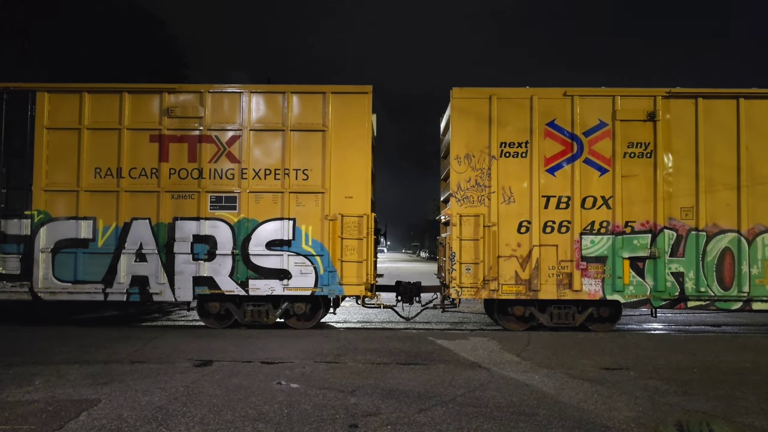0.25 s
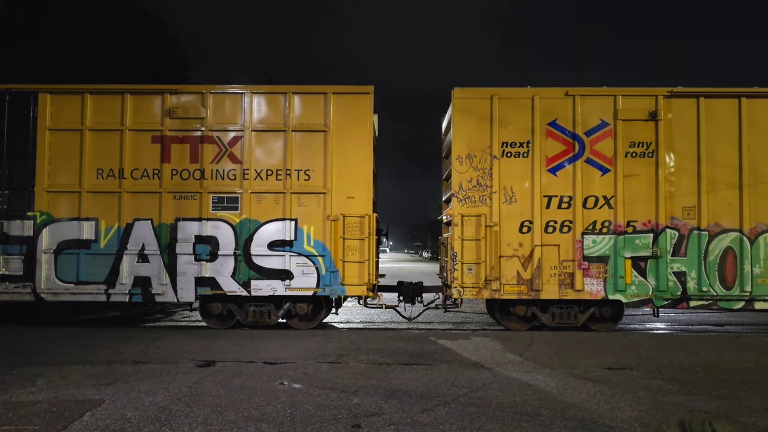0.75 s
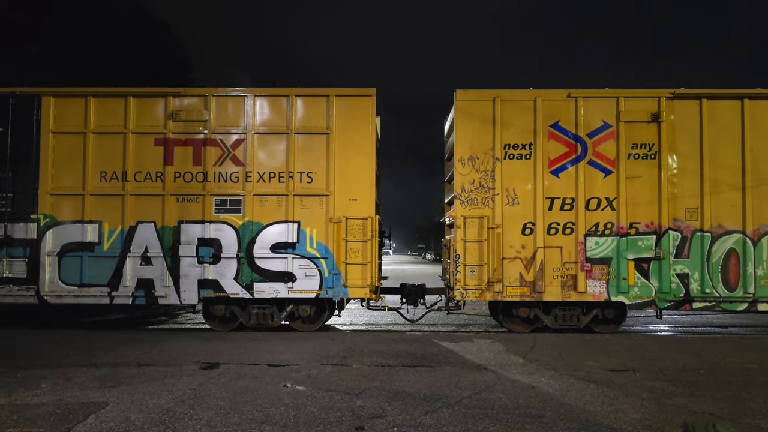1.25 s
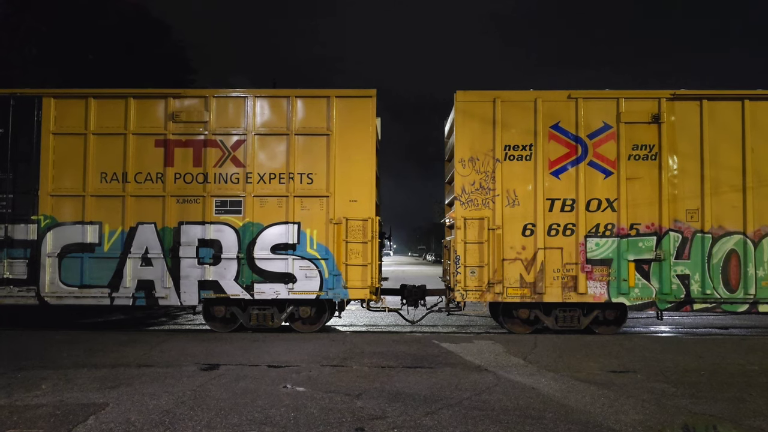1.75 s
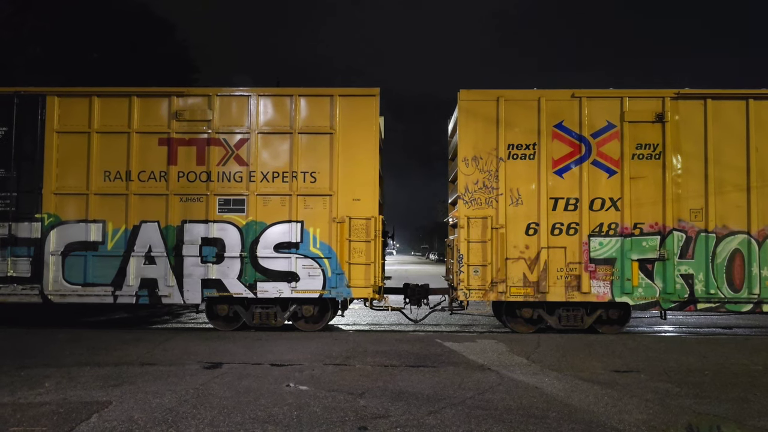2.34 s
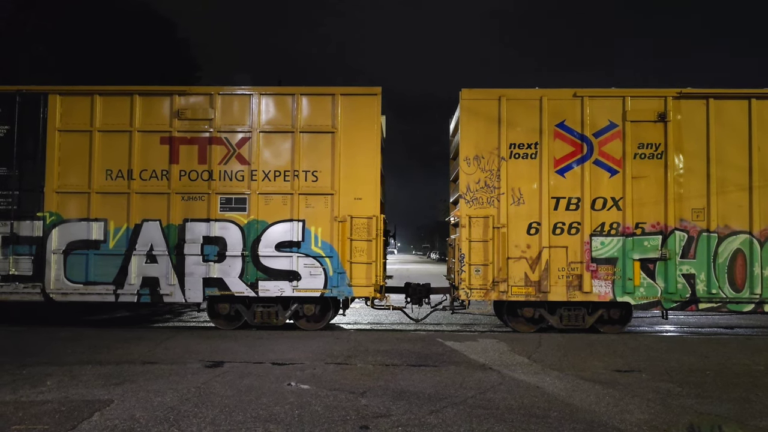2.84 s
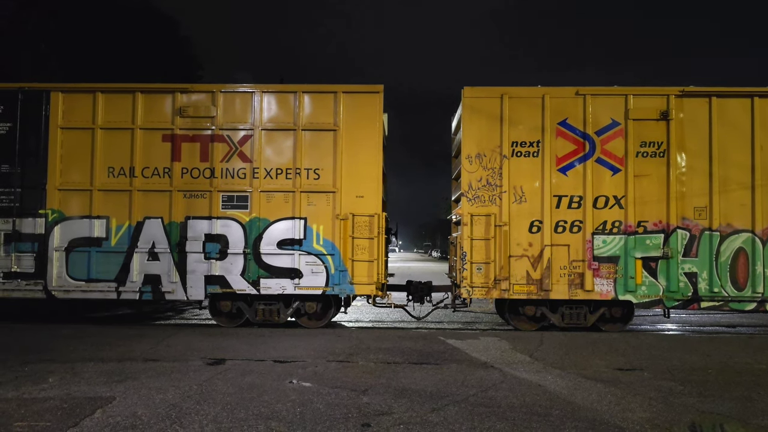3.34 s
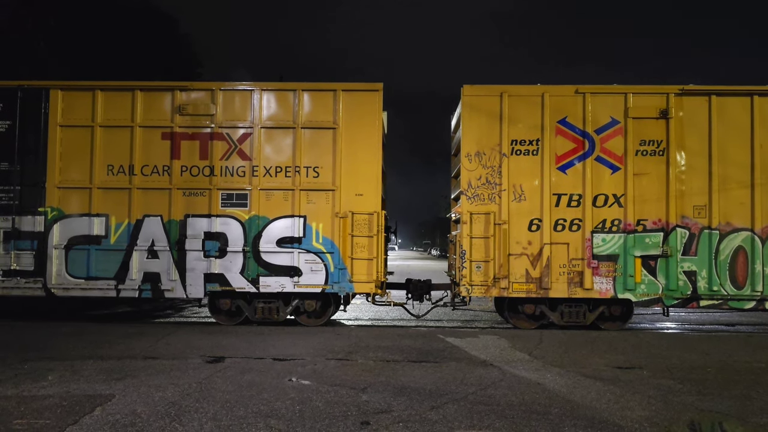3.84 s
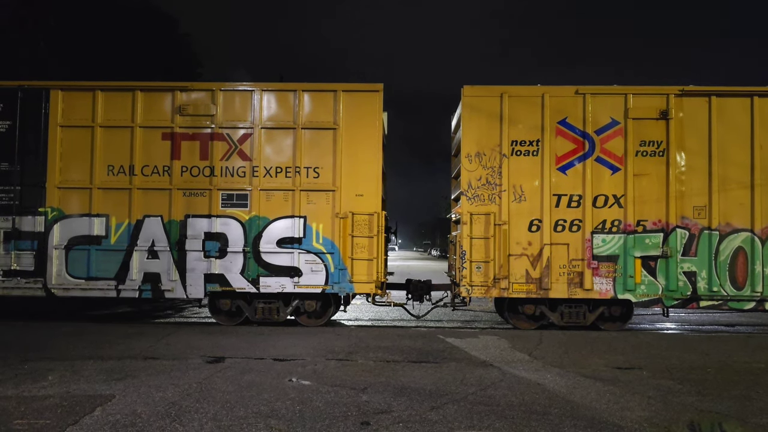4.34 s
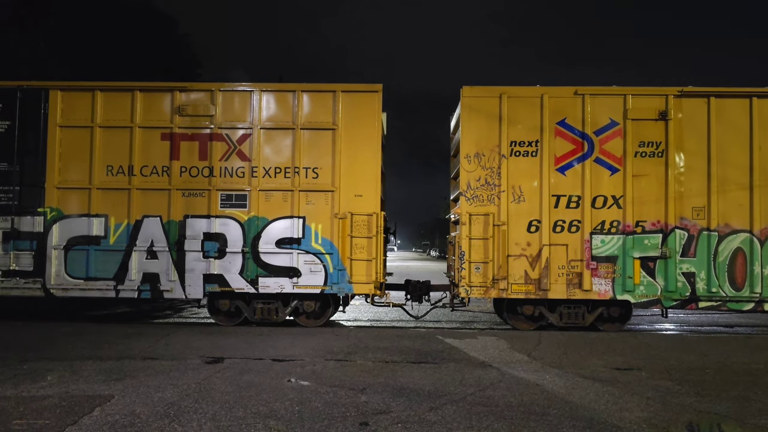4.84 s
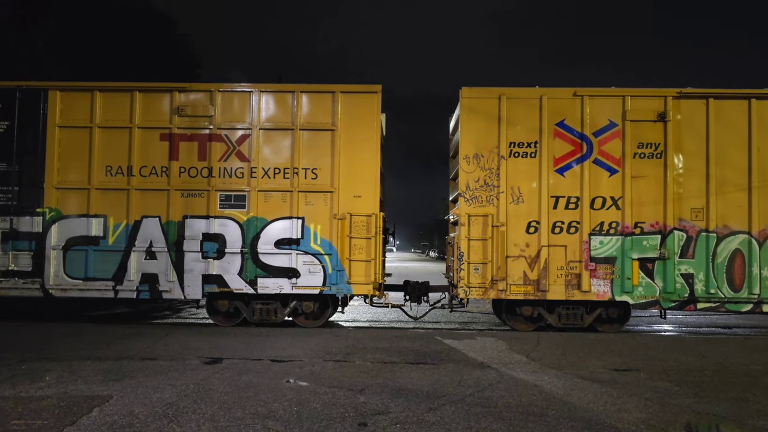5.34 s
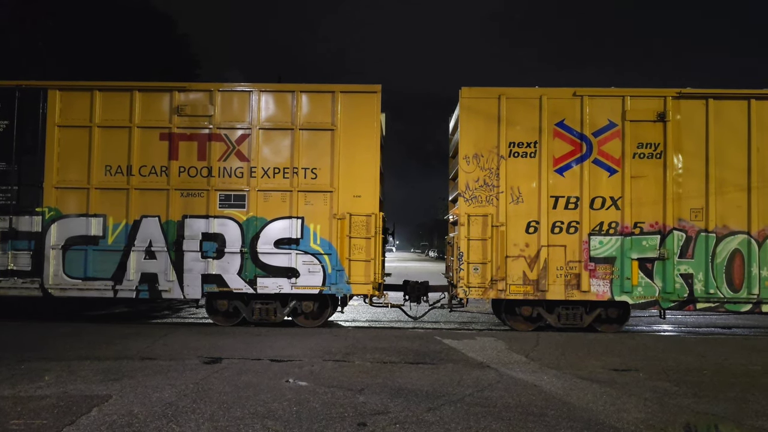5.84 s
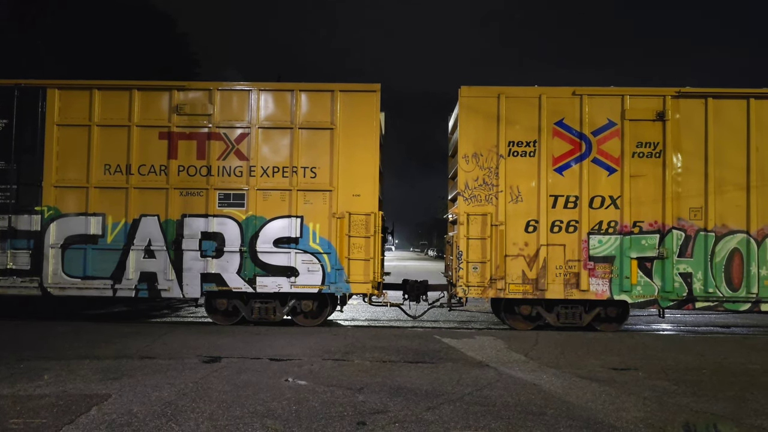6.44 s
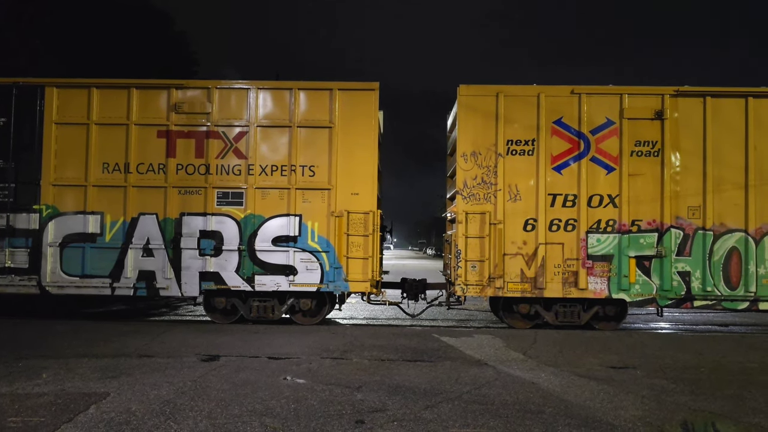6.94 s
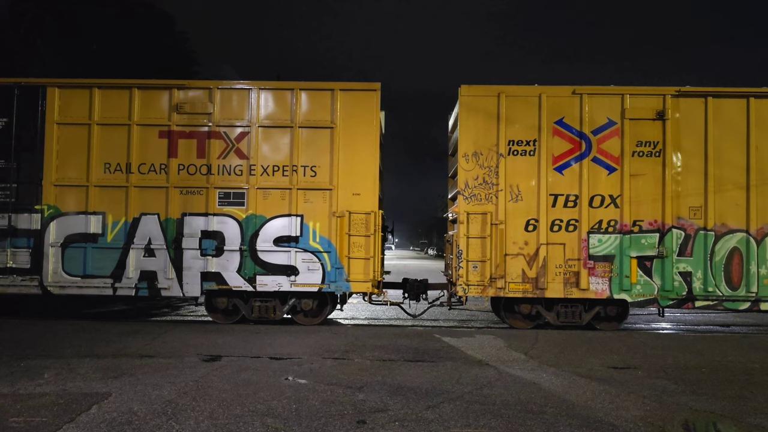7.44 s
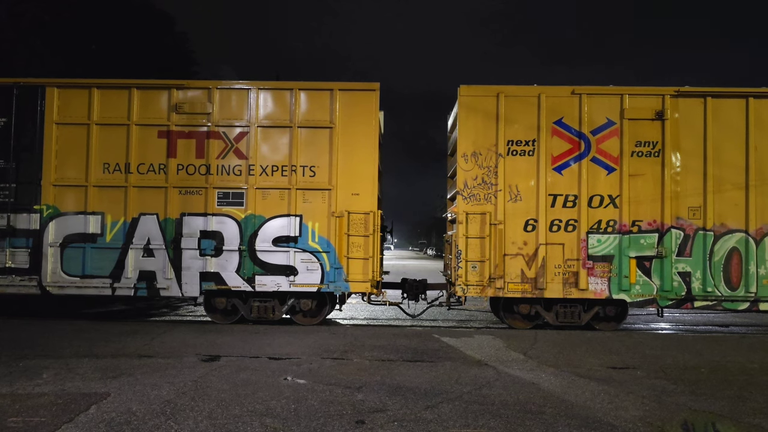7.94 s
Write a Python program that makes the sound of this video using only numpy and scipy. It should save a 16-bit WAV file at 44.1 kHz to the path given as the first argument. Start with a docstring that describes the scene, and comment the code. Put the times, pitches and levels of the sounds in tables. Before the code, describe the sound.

A steel coupler clanks and an empty boxcar booms and shudders, followed by three high bird calls over night insects and faint engine rumble.

```python
"""A rail yard at night. A freight train takes up slack: the drawbar groans, a steel coupler clanks a little
to the left, then the draft gear bottoms out and an empty boxcar booms, rattles and shudders. A bird gives
three falling two-voiced whistles that echo off the cars. Behind them a diesel idles far off, a cricket
trills among shrill insects, and two faint ticks and two far whooshes pass."""
import sys
import numpy as np
from scipy import signal
from scipy.fft import rfft, irfft, next_fast_len
from scipy.io import wavfile
from scipy.ndimage import map_coordinates

SR = 44100
rng = np.random.default_rng(int(sys.argv[2]) if len(sys.argv) > 2 else 0)


def persist_wave(psi):
    """Save psi, clipped to +-1, as 16-bit WAV."""
    counts = np.round(np.clip(psi, -1, 1) * 32767).astype(np.int16)
    wavfile.write(sys.argv[1], SR, np.atleast_2d(counts).T)


N = 361090


def coupler(ring_db=-32.5, clash_db=-24.5, crack_db=-22, scatter_db=-5, wet_db=-14):
    """The knuckles chatter; each contact cracks and rings the castings, a little differently."""
    # Steel faces meeting. Each row: start in seconds, level in dB.
    contacts = [(0.342, -5.5), (0.348, -1.5), (0.358, 0), (0.371, -11), (0.383, -3.5), (0.398, -14)]
    # Casting modes. Each row: frequency in Hz, level in dB, T60 in seconds.
    casting_modes = [(167, 1.5, 0.58), (726, 0, 0.27), (979, -4, 0.34), (1610, 4, 0.16), (1701, -5, 0.29),
                     (1730, -6, 0.19), (1974, -4, 0.35), (2100, -10, 0.23), (2150, 1.5, 0.31),
                     (2270, -10, 0.45), (2880, -2, 0.41), (2950, 4.5, 0.17), (3343, -9, 0.34),
                     (3760, -7, 0.2), (3930, -10, 0.26), (4680, -16, .3), (4640, 0, 0.32),
                     (5146, -18, 0.32), (5870, -2, 0.45), (7900, -1.5, 0.26), (8040, -11.5, 0.51),
                     (8780, -13.5, 0.31), (10900, -19, 0.23), (11886, -8, 0.28), (12700, -20, .36)]
    # Dense casting modes; bare face contact. Each row: frequency in Hz, relative density in dB.
    clash_spectrum = [(70, -45), (120, -26), (170, 1.5), (400, -2), (480, -5), (740, -2.5), (1100, -10.5),
                      (1650, 0), (2300, -3.5), (2700, -6), (3100, -7), (4700, -10.5), (7400, -20),
                      (9700, -34), (12000, -29), (14000, -41)]
    crack_spectrum = [(300, -23), (1700, 1.5), (3500, -10), (7000, -11), (9500, -23), (11000, -13),
                      (12500, -25), (14000, -44)]
    # Decay of the dense modes. Each row: frequency in Hz, T60 in seconds.
    clash_t60 = [(150, 0.48), (600, 0.71), (1700, 0.33), (5000, 0.54), (12000, 0.48)]
    # Each row: frequency in Hz, left minus right in dB.
    balance = [(400, 0.5), (1500, -3.5), (2400, -2), (4400, 3.5), (8000, 13), (12000, 10)]
    t = np.arange(SR // 2) / SR
    hz, mode_db, t60_s = np.transpose(casting_modes)[..., None]
    steel, clash, scattered = np.zeros(N), np.zeros(N), np.zeros((2, N))
    rise = 1 - np.exp(-t / 0.0015)
    for start_s, db in contacts:
        strength, detune, phase = rng.standard_normal((3, len(hz), 1))
        detuned_hz = hz * (1 + 0.002 * detune * np.sqrt(1000 / hz))
        partials = np.sin(2 * np.pi * (detuned_hz * t + phase))
        ring = np.sum(amp(mode_db + 2 * strength) * fade(t, t60_s) * partials, axis=0)
        crack = diffuse(crack_spectrum, len(t))[0] * fade(t, t60_s=0.04)
        add(steel, start_s, amp(db) * rise * (amp(ring_db) * ring + amp(crack_db) * crack))
        burst = band_decay(diffuse(clash_spectrum, len(t))[0], clash_t60)
        add(clash, start_s, amp(db + clash_db) * rise * burst)
        # the car ends reflect the blow from all sides
        reflection = band_decay(diffuse(clash_spectrum, len(t)), clash_t60)
        add(scattered, start_s + 0.0027, amp(db + clash_db + scatter_db) * rise * reflection)
    direct = pan(steel + dense_modes(clash, depth_db=2, spacing_hz=91.3), balance, lag_ms=0.574)
    return direct + scattered + amp(wet_db) * yard_echo(clash[None] + amp(-4.5) * steel)


def boxcar(boom_db=-23.5, panel_db=-29, rattle_db=-36, clang_db=6, wet_db=-13):
    """Each jolt drums the hollow shell and shakes its fittings."""
    # Draft gear blows. Each row: start in seconds, boom level in dB, rattle level in dB.
    jolts = [(1.111, -2.5, -1), (1.119, 1.5, 5), (1.143, 0, -11), (1.18, -1.5, -9), (1.213, -5, -4.5),
             (1.242, 1, -12), (1.278, -5, -3), (1.298, -3, -3)]
    # Each row: frequency in Hz, level in dB, T60 in seconds.
    shell_modes = [(70.4, -14, 0.34), (105.4, -12.5, 0.64), (129.3, -12, 0.55), (187.7, -6.5, 0.38),
                   (218.2, -4.5, 0.31), (234.4, -1.5, 0.33)]
    # Dense panel modes; loose fittings. Each row: frequency in Hz, relative density in dB.
    panel_spectrum = [(29, -45), (50, -42), (112, -28), (161, -9.5), (229, -5.5), (302, -20), (727, -25),
                      (1020, -58), (1120, -27.5), (1400, -46), (1820, -71), (3080, -120)]
    rattle_spectrum = [(300, -36), (700, 5.5), (1200, -3), (2000, -1), (2800, -6.5), (3700, -6),
                       (5600, -6.5), (7400, -4.5), (8600, -21), (10500, -31), (12000, -23), (14000, -32)]
    # Ladders, door bars, brake rods. Each row: frequency in Hz, width in Hz, gain in dB.
    fitting_modes = [(2100, 35, -27), (3180, 62, 0), (3800, 55, -4.5), (4820, 150, 2.5), (5400, 84, -9),
                     (6230, 33, 1), (6720, 35, -3), (7400, 30, -9)]
    t = np.arange(3 * SR // 4) / SR
    shell, panel_power, rattle_power = np.zeros((3, 3 * SR))
    hz, mode_db, t60_s = np.transpose(shell_modes)[..., None]
    rise = 1 - np.exp(-t / 0.002)
    for start_s, db, loose_db in jolts + shudder():
        strength, detune = rng.standard_normal((2, len(hz), 1))
        partials = np.sin(2 * np.pi * hz * (1 + 0.015 * detune) * t)
        boom = np.sum(amp(mode_db + 2 * strength) * fade(t, t60_s) * partials, axis=0)
        add(shell, start_s, amp(db + boom_db) * rise * boom)
        # in dense modes, overlapping jolts add in power
        add(panel_power, start_s, (amp(db + panel_db) * rise * fade(t, t60_s=0.6)) ** 2)
        add(rattle_power, start_s, (amp(loose_db + rattle_db) * rise * fade(t, t60_s=0.28)) ** 2)
    rattle = np.sqrt(rattle_power) * diffuse(rattle_spectrum, len(shell))
    fittings = dense_modes(rattle, depth_db=1.5, spacing_hz=59.8)
    fittings += amp(clang_db) * resonate(rattle, fitting_modes)
    panels = np.sqrt(panel_power) * diffuse(panel_spectrum, len(shell))
    out = np.zeros((2, N))
    add(out, 0, shell + panels + fittings)
    return out + amp(wet_db) * yard_echo(out)


def shudder(count=12, start_s=1.375, gap_s=0.07, jitter_s=0.01008, boom_db=-9, rattle_db=-14):
    """The car shudders on its springs: rows of nearly even, ever weaker jolts."""
    elapsed_s = gap_s * np.arange(count)
    loss_db = 16.5 * elapsed_s
    times_s = start_s + elapsed_s + jitter_s * rng.standard_normal(count)
    return list(zip(times_s, boom_db - loss_db, rattle_db - loss_db))


def drawbar(rough_db=3, squeak_db=-58, slack_gone_s=0.81):
    """The drawbar slips under load and groans; it squeaks until the slack is gone."""
    # Each row: peak time in seconds, half length in seconds, level in dB.
    slips = [(.005, 0.05, -46.5), (.25, 0.046, -52), (.335, 0.018, -47.5), (.62, 0.26, -54.5),
             (1.025, 0.031, -47.5), (1.11, 0.035, -49)]
    # Steel resonances. Each row: frequency in Hz, width in Hz, gain in dB.
    groan_modes = [(613, 90, 5), (1160, 100, -1), (1780, 500, -2)]
    squeak_modes = [(3720, 77, 2), (6190, 97, -3)]
    friction = rng.standard_normal((2, N)) * amp(rough_db * wobble(61.3))
    groan = swells(slips) * unit_rms(resonate(friction, groan_modes))
    release = fade(np.maximum(np.arange(N) / SR - slack_gone_s, 0), t60_s=0.68)
    return groan + amp(squeak_db) * release * unit_rms(resonate(friction, squeak_modes))


def bird(lead_s=0.14, main_delay_s=0.049, low_delay_s=0.064, rasp=0.0086, wet_db=-9.5):
    """Each call is a short lead note, a long main note and a lower second voice."""
    # Each row: start and length in seconds, pitch in Hz, sag in Hz per second, opening drop in Hz,
    # level and overtone in dB, then the low voice's pitch in Hz, level in dB and rasp as a fraction.
    calls = [(2.868, 0.16, 5560, 1060, 954, -45.5, -32, 4560, -57.5, .04),
             (3.845, 0.29, 5734, 1035, 542, -43.5, -30, 4660, -51.5, 0.0097),
             (6.977, 0.33, 5860, 359, 1052, -50, -16, 4560, -50, 0.0094)]
    song = np.zeros(N)
    for start_s, length_s, hz, sag, drop_hz, db, overtone_db, low_hz, low_db, low_rasp in calls:
        lead = whistle(lead_s, hz, rasp, overtone_db, 0.48 * drop_hz, sag)
        main = whistle(length_s, hz, rasp, overtone_db, drop_hz, sag, taper=0.38)
        low = whistle(0.67 * length_s, low_hz, low_rasp, overtone_db=-27, taper=0.53)
        add(song, start_s, amp(db - 0.5) * lead)
        add(song, start_s + main_delay_s, amp(db) * main)
        add(song, start_s + low_delay_s, amp(low_db) * low)
    echo = amp(wet_db) * yard_echo(song[None], build_s=0.0027)
    return pan(song + echo, balance=[(5000, -5)], lag_ms=0.23)


def whistle(length_s, held_hz, rasp, overtone_db, drop_hz=0, sag_hz_per_s=0, taper=0.37):
    """A fluttering note drops onto its pitch, then sags; its overtone grows as the pitch settles."""
    t = np.arange(int(length_s * SR)) / SR
    drop = np.exp(-t / 0.019)
    hz = held_hz + drop_hz * drop - sag_hz_per_s * t
    phase = 2 * np.pi * np.cumsum(hz * (1 + rasp * wobble(508, len(t)))) / SR
    flutter_db = 2.5 * wobble(93.8, len(t))
    envelope = amp(flutter_db) * np.sin(np.pi * t / length_s) ** taper
    return envelope * (np.sin(phase) + amp(overtone_db) * (1 - drop) * np.sin(2 * phase))


def ticks(t60_s=0.021):
    """Two tiny bright clicks."""
    # Each row: start in seconds, level in dB.
    clicks = [(2.263, -43), (2.733, -59)]
    spectrum = [(2000, -30), (6000, -7), (13000, -16), (15000, -17)]
    out, t = np.zeros((2, N)), np.arange(4096) / SR
    for start_s, db in clicks:
        add(out, start_s, amp(db) * diffuse(spectrum, len(t)) * fade(t, t60_s))
    return out


def diesel(rumble_db=-43, moving_db=3.5, settled_s=2.45, settling_s=0.56):
    """Far rumble with unsteady idling tones; the rumble is stronger while the cars move."""
    # Distant diesel and town. Each row: frequency in Hz, relative density in dB.
    spectrum = [(13, -59), (22, -13), (80, -4), (107, -12.5), (234, -14), (265, -22), (481, -29.5),
                (556, -30.5), (682, -30.5), (821, -39), (1590, -38), (1760, -41.5), (2030, -34),
                (2760, -52.5), (3000, -41), (3900, -55.5), (6600, -120)]
    # Each row: frequency in Hz, level in dB.
    idle_tones = [(79, -50), (158, -55.5), (235, -59)]
    t = np.arange(N) / SR
    moving = np.clip((settled_s - t) / settling_s, 0, 1)
    out = amp(rumble_db + moving_db * moving + 0.92 * wobble(7)) * diffuse(spectrum)
    for hz, db in idle_tones:
        out += amp(db + 3.1 * wobble(4.2)) * np.sin(2 * np.pi * hz * t + 1.44 * wobble(5))
    return out


def insects(chorus_db=-56.5, shimmer_db=0.8, sizzle_gain_db=4.5, peak_s=2.89, period_s=0.53):
    """A shrill chorus; its highest rasp, a sizzle, swells in a slow, even cycle."""
    # Each row: frequency in Hz, relative density in dB.
    chorus_spectrum = [(2000, -34), (2700, -10.5), (3100, -5), (3330, -9.5), (3600, 2), (4140, 5),
                       (5000, 2.5), (6000, 5), (6600, 2), (7500, -3), (8600, -10), (9900, -13),
                       (11000, -21.5), (15000, -21)]
    sizzle_spectrum = [(3000, -60), (10500, -16), (12000, 7.5), (14000, 0.5), (15200, -25.5)]
    # Each row: frequency in Hz, left minus right in dB.
    balance = [(3000, -2.5), (4500, -3), (5800, -6), (7400, -5), (8400, 6.5), (15000, 8.5)]
    # Each row: time in seconds, level in dB before the gain.
    sizzle_trend = [(1.7, -81), (1.9, -73), (2.15, -74), (2.5, -81.5), (4.5, -79.5), (5, -84), (5.6, -81.5),
                    (8.19, -89)]
    chorus = unit_rms(pan(diffuse(chorus_spectrum), balance)) * amp(chorus_db + shimmer_db * wobble(40))
    swing_db = 1.5 * np.cos(2 * np.pi * (np.arange(N) / SR - peak_s) / period_s)
    return chorus + amp(curve(sizzle_trend) + swing_db + sizzle_gain_db) * diffuse(sizzle_spectrum)


def cricket(level_db=-68, centre_hz=7350, width_hz=230, strokes_per_s=52.4, steady=1.9):
    """A steady trill: each wing stroke briefly strengthens a rasp at the wing resonance."""
    strokes = np.cumsum(strokes_per_s * (1 + 0.01 * wobble(2))) / SR
    rasp = filtered(rng.standard_normal(N), lambda hz: np.exp(-((hz - centre_hz) / width_hz) ** 2 / 2))
    pulse = np.sin(np.pi * strokes) ** 8
    pan_db = np.array([[-3], [3]])
    return amp(level_db + pan_db) * unit_rms(rasp * (steady + pulse))


def whooshes():
    """Two far whooshes swell and fade."""
    # Each row: peak time in seconds, half length in seconds, level in dB.
    passes = [(3.25, 0.34, -65), (4.55, 0.38, -55)]
    # Each row: frequency in Hz, relative density in dB.
    spectrum = [(200, -10), (400, -1.5), (650, 9), (850, -1), (1100, 3), (1400, -32), (3000, -35)]
    return swells(passes) * diffuse(spectrum)


def yard_echo(x, build_s=0.093):
    """Scattered echoes from the cars and the pavement."""
    # Each row: frequency in Hz, T60 in seconds.
    yard_t60 = [(100, 4.2), (400, 1.73), (2000, 1.43), (5000, 1.52), (12000, 1.26)]
    t = np.arange(2 * SR) / SR
    white = diffuse([(100, 0), (10000, 0)], len(t))
    tail = band_decay(white, yard_t60) * (1 - np.exp(-t / build_s))
    return signal.fftconvolve(x.mean(0)[None], tail / np.linalg.norm(tail[0]), axes=1)[:, :N]


def diffuse(spectrum, size=N):
    """Stereo noise of RMS 1 shaped by (Hz, dB) points, near mono in the bass."""
    # Each row: frequency in Hz, left-right correlation from -1 to 1.
    correlation = [(60, 0.93), (130, 0.97), (290, 0.75), (640, 0.085), (1400, -0.33), (3100, 0.37),
                   (6800, -0.65), (15000, 0.48)]

    def response(hz):
        angle = np.arccos(np.clip(along(correlation, hz), -1, 1)) / 2
        return amp(along(spectrum, hz)) * [np.cos(angle), np.sin(angle)]

    mid, side = filtered(rng.standard_normal((2, size)), response)
    return unit_rms(np.array([mid + side, mid - side]))


def band_decay(noise, t60_points):
    """Each frequency of the noise dies at its own rate."""
    hz, t, bins = signal.stft(noise, SR, nperseg=256)
    bins = bins * fade(t, along(t60_points, hz)[:, None])
    return signal.istft(bins, SR, nperseg=256)[1][..., :noise.shape[-1]]


def resonate(x, modes):
    """Parallel resonances of alternating sign."""
    return filtered(x, lambda f: sum(
        (-1) ** k * amp(db) * 1j * f * width_hz / (hz * hz - f * f + 1j * f * width_hz)
        for k, (hz, width_hz, db) in enumerate(modes)))


def dense_modes(x, depth_db, spacing_hz):
    """Close resonances: random peaks and dips about spacing_hz apart."""
    knots_db = depth_db * rng.standard_normal(4096)
    return filtered(x, lambda hz: min_phase(map_coordinates(knots_db, [hz / spacing_hz], mode="mirror")))


def min_phase(db):
    """Response of mean power 1 that rings only after the blow."""
    cepstrum = irfft(np.log(amp(db)))
    half = len(cepstrum) // 2
    cepstrum[1:half] *= 2
    cepstrum[half + 1:] = 0
    return np.exp(rfft(cepstrum)) / np.sqrt(np.mean(amp(db) ** 2))


def pan(x, balance, lag_ms=0):
    """Tilt between the ears by (Hz, left minus right dB) points; the right hears lag_ms later."""
    ears = np.array([[0.5], [-0.5]])
    lead_s = ears * lag_ms / 1000
    return filtered(x, lambda hz: amp(ears * along(balance, hz)) * np.exp(2j * np.pi * hz * lead_s))


def swells(rows):
    """Gain curve of bell-shaped swells."""
    u = np.linspace(-4, 4, 65)
    bell = np.exp(-u ** 2)
    return sum(curve(np.column_stack([peak_s + half_s * u, amp(db) * bell]))
               for peak_s, half_s, db in rows)


def wobble(knots_per_s, size=N):
    """Smooth random curve."""
    knots = rng.standard_normal(int(size * knots_per_s / SR) + 4)
    coarse = np.arange(0, size, 16)
    return np.interp(np.arange(size), coarse, map_coordinates(knots, [coarse * knots_per_s / SR]))


def filtered(x, response):
    """Apply a response given as a function of Hz."""
    size = x.shape[-1]
    padded = next_fast_len(size + 8192)
    return irfft(rfft(x, padded) * response(np.fft.rfftfreq(padded, 1 / SR)), padded)[..., :size]


def along(points, hz):
    """Interpolate (Hz, value) points on a log axis."""
    point_hz, values = np.transpose(points)
    return np.interp(np.log(hz + 1), np.log(point_hz + 1), values)


def curve(points):
    """Interpolate (seconds, value) points to every sample."""
    return np.interp(np.arange(N) / SR, *np.transpose(points))


def add(track, start_s, sound):
    part = track[..., max(round(start_s * SR), 0):][..., :sound.shape[-1]]
    part += sound[..., :part.shape[-1]]


def fade(t, t60_s):
    return np.exp(-np.log(1000) * t / t60_s)


def amp(db):
    return 10 ** (np.asarray(db) / 20)


def unit_rms(x):
    return x / np.sqrt(np.mean(x ** 2) + 1e-20)


def scene():
    train = coupler() + boxcar() + drawbar()
    return train + ticks() + bird() + cricket() + diesel() + insects() + whooshes()


def record(dry):
    """Nothing above 15.4 kHz is heard."""
    return filtered(dry, lambda hz: hz < 15400)


dry = scene()
out = record(dry)
persist_wave(out)
```